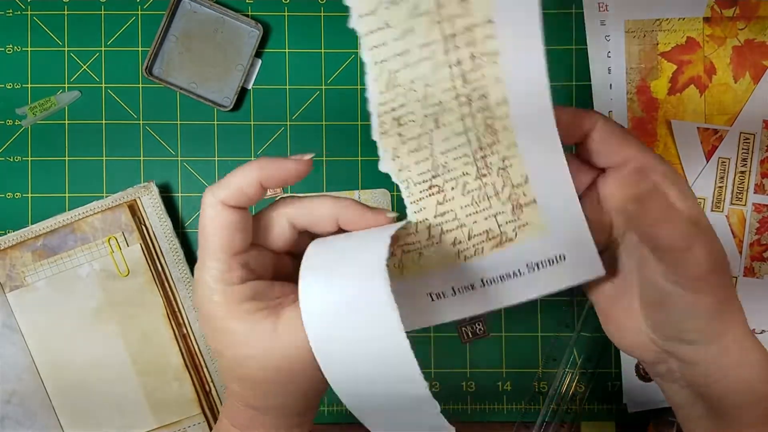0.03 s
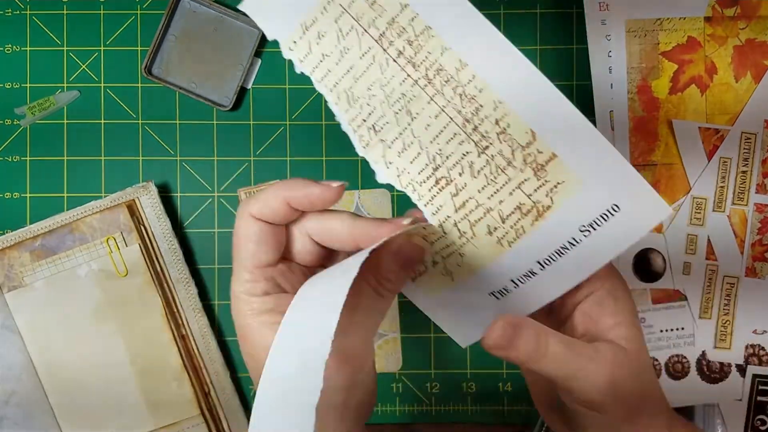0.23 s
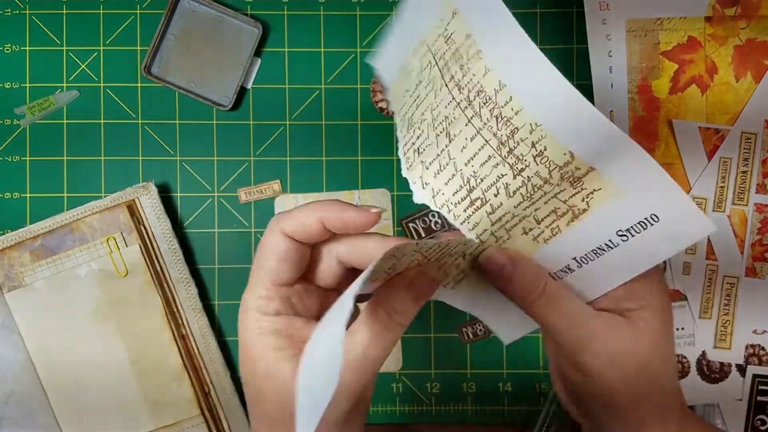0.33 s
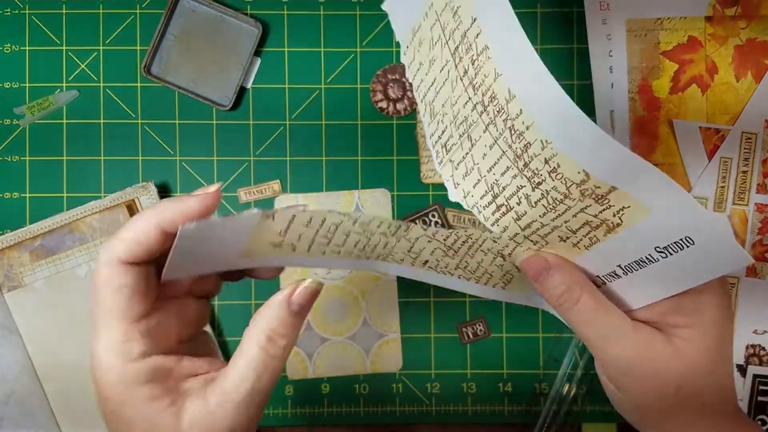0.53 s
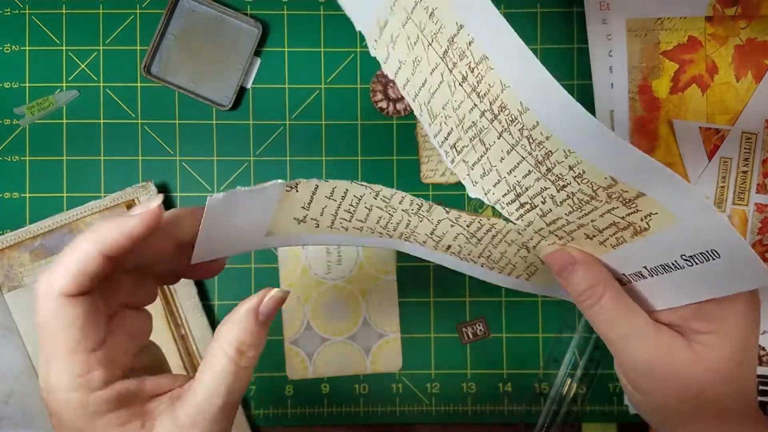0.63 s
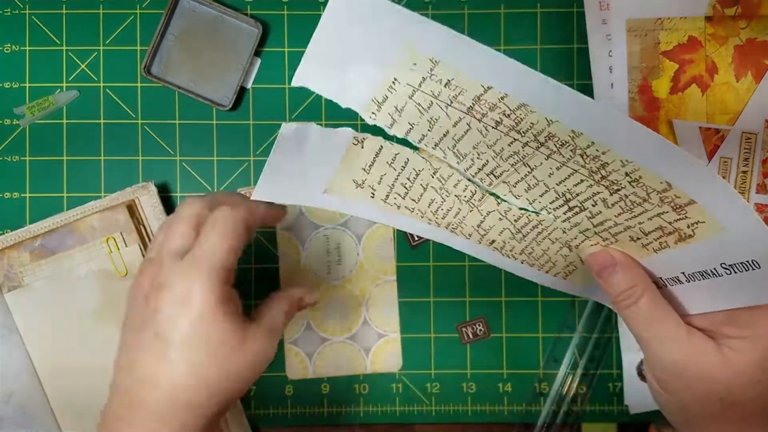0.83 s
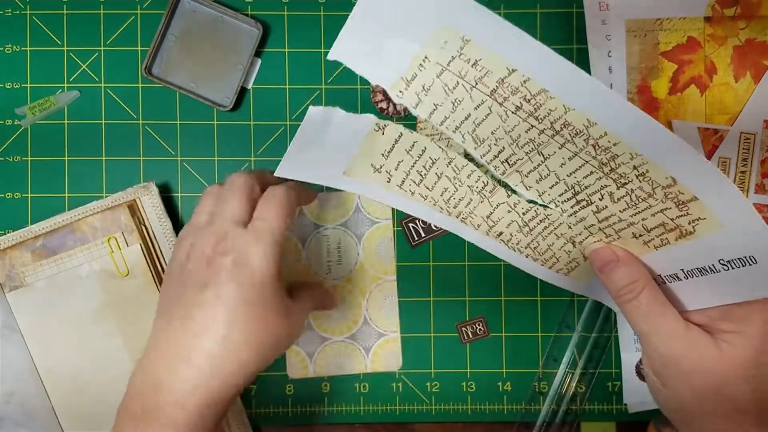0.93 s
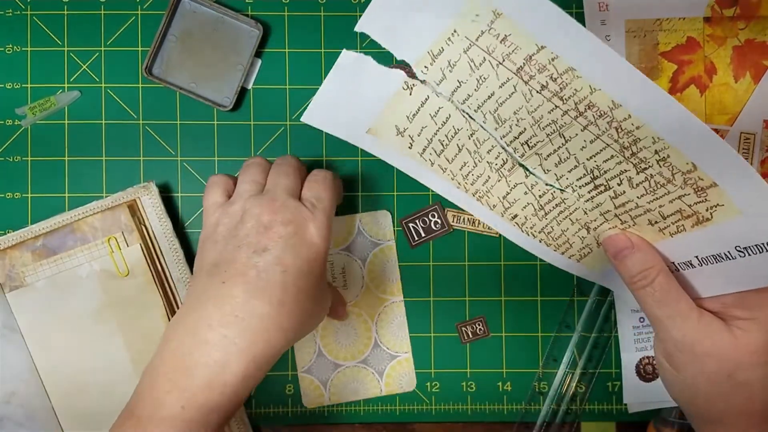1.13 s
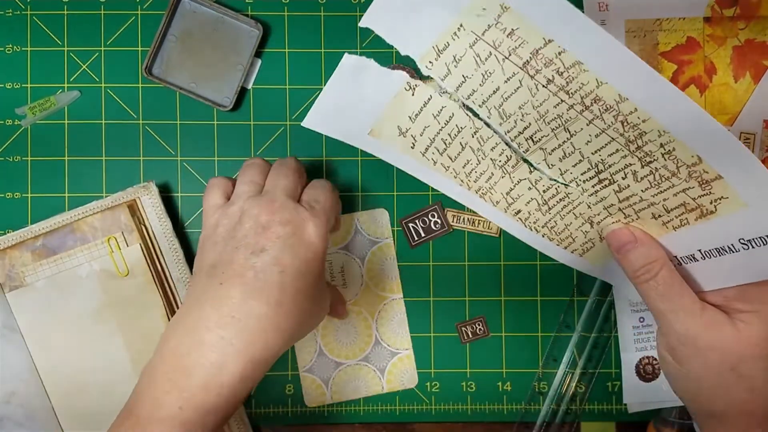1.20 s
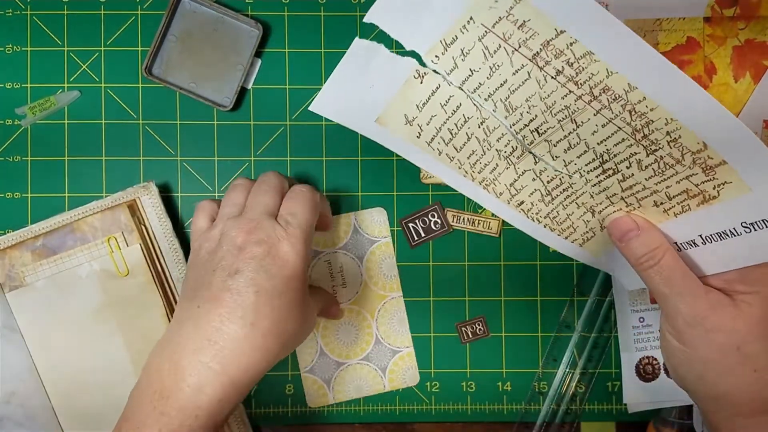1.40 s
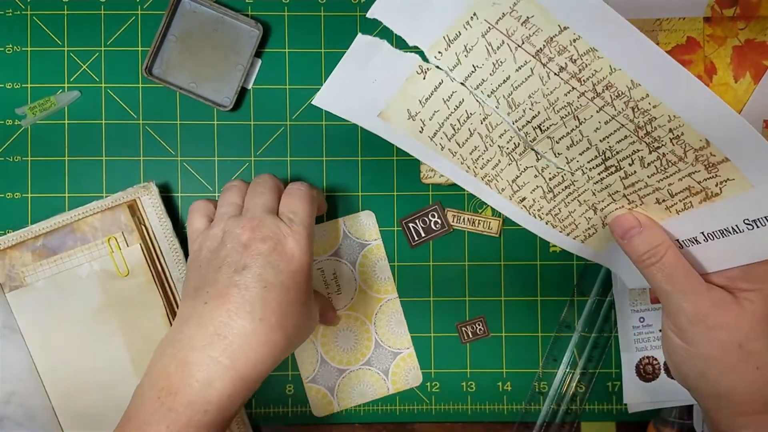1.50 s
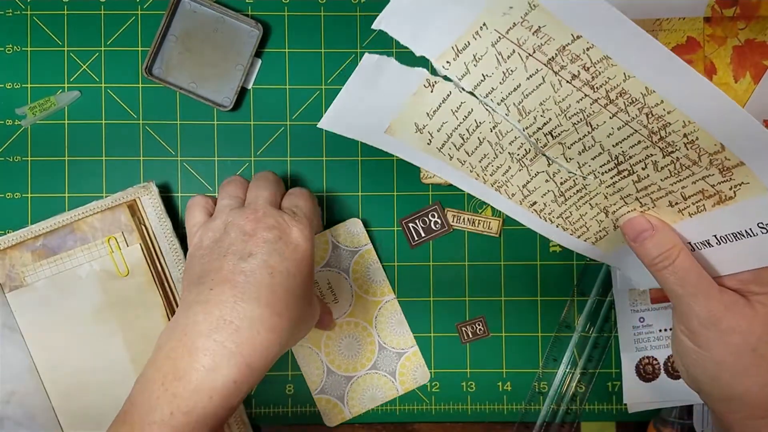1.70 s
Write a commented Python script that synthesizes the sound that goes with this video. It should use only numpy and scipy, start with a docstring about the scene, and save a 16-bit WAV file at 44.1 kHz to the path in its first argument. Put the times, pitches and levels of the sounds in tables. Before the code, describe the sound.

Paper ripped by hand: brief crunch and loud snap, light rustles, then dull card and finger knocks

```python
"""A strip is torn off a sheet of paper by hand over a craft table in a small room with a faint hum.
The last fibres crackle, creases crunch and the taut sheet snaps; the loose strip flaps, flicks and slides.
Then a hand comes down on a card on the cutting mat and drags it; at last the slack sheet pops and rubs on.
Snaps, pops and knocks are short sines, crackle and rubbing are coloured clicks, hiss is coloured noise."""
import sys
import numpy as np
from scipy import signal
from scipy.fft import rfft, irfft, next_fast_len
from scipy.io import wavfile

SR = 44100
rng = np.random.default_rng(int(sys.argv[2]) if len(sys.argv) > 2 else 0)


def log_audio(samples):
    """Write samples as a 16-bit WAV file to the path given in sys.argv[1]."""
    # one column per channel
    frames = np.atleast_2d(samples).T
    # limit to full scale, then quantise
    limited = np.clip(frames, -1, 1)
    pcm = np.round(limited * 32767).astype(np.int16)
    wavfile.write(sys.argv[1], SR, pcm)


N = 77175
T = np.arange(N) / SR
ATTACK_S = 0.00031  # rise of a click shower and of the room's tail

# left-right likeness of steady noise, rubbing and the room's tail: (f/Hz, likeness 0-1)
DIFFUSE_LIKENESS = [(30, 0.2), (100, 0.82), (350, 0.83), (1000, 0), (3000, 0), (12000, 0)]
# left-right likeness of fibre showers, touches and drags: (f/Hz, likeness 0-1)
CONTACT_LIKENESS = [(200, 0.94), (1000, 0.71), (3000, 0.25), (7000, 0.086), (14000, 0.102)]


def from_db(db):
    """Decibels to amplitude gain."""
    return 10 ** (np.asarray(db) / 20)


def rms_one(x):
    """Scale to unit rms."""
    return x / np.sqrt(np.mean(x ** 2) + 1e-20)


def on_bins(points):
    """Read a table over log frequency at every bin of a padded transform."""
    hz, value = np.transpose(points)
    bins = np.linspace(1, SR / 2, next_fast_len(N) + 1)
    return np.interp(np.log(bins), np.log(hz), value)


def colour(x, spectrum):
    """Causal (minimum-phase) filter with the shape of the spectrum and unit power gain."""
    gain = rms_one(from_db(on_bins(spectrum)))
    cepstrum = irfft(np.log(gain))
    size = len(cepstrum)
    # folding the cepstrum onto positive time gives minimum phase
    cepstrum[1:size // 2] *= 2
    cepstrum[size // 2 + 1:] = 0
    response = np.exp(rfft(cepstrum))
    return irfft(rfft(x, size) * response)[..., :N]


def stereo(pair, likeness):
    """Blend two unrelated signals into left and right, alike by frequency."""
    alike = np.clip(on_bins(likeness), 0, 1)
    mid, side = rfft(pair, 2 * (len(alike) - 1))
    common = np.sqrt(1 + alike) * mid
    opposed = np.sqrt(1 - alike) * side * [[1], [-1]]
    return irfft(common + opposed)[:, :N]


def grains(per_s, spread_db):
    """Two random trains of tiny clicks of uneven size and sign, rms 1."""
    size_db = spread_db * np.minimum(rng.exponential(1, (2, N)), 3)
    clicks = from_db(size_db) * rng.choice([-1, 1], (2, N))
    struck = rng.random((2, N)) < per_s / SR
    return rms_one(clicks * struck)


def envelope(start, attack, hold, release):
    """Straight rise, hold, exponential fall with time constant release; all in s."""
    rise = np.clip((T - start) / attack, 0, 1)
    fall = np.exp(-np.maximum(T - start - attack - hold, 0) / release)
    return rise * fall


def bursts(rows, spectrum):
    """Quickly dying showers of clicks, one for each (t/s, level/dB, decay/s)."""
    level = sum(from_db(db) * envelope(s, ATTACK_S, 0, decay) for s, db, decay in rows)
    clicks = grains(per_s=5000, spread_db=2.5) * level
    return colour(stereo(clicks, CONTACT_LIKENESS), spectrum)


def ringing(modes):
    """Dying sines of a body struck once, signs alternating: (f/Hz, level/dB, t60/s)."""
    ring = 0
    for k, (hz, db, t60) in enumerate(modes):
        decay = np.exp(-np.log(1000) * T / t60)
        ring = ring + from_db(db) * decay * np.sin(2 * np.pi * hz * T) * (-1) ** k
    return ring


def sheet_pop(event, modes, low_cut_hz=288):
    """Tension lets go at once: each mode swells and dies within ms; a thin sheet radiates no bass."""
    s, db, lead = event
    age = np.maximum(T - s + np.array([[0], [lead]]), 0)  # a lead makes the right ear earlier
    pop = 0
    for hz, level, swell in modes:
        swelling = age / swell * np.exp(1 - age / swell)  # peaks at 1 after the swell time
        pop = pop + from_db(level) * swelling * np.sin(2 * np.pi * hz * age)
    low_cut = signal.butter(4, low_cut_hz, "high", fs=SR, output="sos")
    return from_db(db) * signal.sosfilt(low_cut, pop)


def background():
    """Room air and hiss are coloured steady noise; the faint mains hum is one sine."""
    air_level_db, hum_hz = -63.5, 116.6
    air_db, hum_db = air_level_db, -75
    # spectrum of the air and hiss: (f/Hz, relative level/dB)
    floor_colour = [(25, -4), (45, -37), (62, 0.5), (80, -19.5), (115, 3), (150, -3.5), (320, 1.5),
                    (600, -4), (1500, -7), (3500, -16.5), (7500, -25.5), (10000, -24), (13000, -14.5),
                    (16000, -16.5)]
    air = colour(stereo(rng.standard_normal((2, N)), DIFFUSE_LIKENESS), floor_colour)
    hum = rms_one(np.sin(2 * np.pi * hum_hz * T))
    return from_db(air_db) * air + from_db(hum_db) * hum


def room(x):
    """Walls return a short diffuse noise tail and a few ringing resonances."""
    tail_db, tail_t60_s, gap_s, ring_t60_s = -12.5, 0.15, 0.0079, 0.16
    # lasting resonances of the room: (f/Hz, level/dB)
    room_modes = [(402, -61), (484, -58), (535, -57), (737, -63), (985, -62), (1245, -61.5), (1558, -59),
                  (1664, -60)]
    # spectrum of the tail: (f/Hz, relative level/dB)
    room_colour = [(100, -14.5), (260, -8.5), (450, 1), (1600, -1.5), (2350, -5.5), (3200, 1.5), (8000, -4),
                   (16000, 4)]
    tail = rng.standard_normal((2, N)) * envelope(gap_s, ATTACK_S, 0, tail_t60_s / np.log(1000))
    unit_energy = rms_one(tail) / np.sqrt(N)
    tail = colour(stereo(unit_energy, DIFFUSE_LIKENESS), room_colour)
    rings = ringing([(hz, db, ring_t60_s) for hz, db in room_modes])
    return signal.fftconvolve(x, from_db(tail_db) * tail + rings, axes=1)[:, :N]


def drags():
    """The palm drags the card over the mat: grains of friction in a soft, low rub."""
    # drags: (start t/s, attack/s, hold/s, release/s, level/dB)
    drag_moves = [(.905, 0.011, 0.031, 0.024, -58), (1.405, 0.031, 0.032, 0.063, -66)]
    # spectrum of the muffled rub: (f/Hz, relative level/dB)
    drag_colour = [(90, -13), (200, 0.5), (420, 0.5), (900, -5), (1400, -12.5), (2000, -23.5), (8000, -32)]
    level = sum(from_db(db) * envelope(*shape) for *shape, db in drag_moves)
    friction = level * grains(per_s=1800, spread_db=1.0)
    return colour(stereo(friction, CONTACT_LIKENESS), drag_colour)


def taps():
    """Each touch on the mat is a soft push, a knock of the table, a dull scuff and a dry tick."""
    scuff_db, tick_decay_s = -2.5, 0.0014  # the scuff's level is relative to the knock's setting
    # fingers and card touch the mat: (t/s, knock/dB, scuff decay/s, tick/dB, push/dB)
    touches = [(.9022, -50, 0.013, -44.5, -45), (0.9334, -59, 0.011, -68, -44),
               (1.0298, -50.5, 0.01, -52, -52.5), (1.0470, -53, 0.0035, -38.5, -68),
               (1.0722, -41.5, 0.0048, -44.5, -43.5), (1.0845, -50, 0.0059, -66, -70),
               (1.224, -54.5, 0.0093, -46, -50), (1.3931, -59.5, 0.008, -73, -49.5)]
    # what the table top rings with: (f/Hz, relative level/dB, t60/s)
    table_modes = [(120, -13.5, 0.18), (320, -6.5, 0.094), (387, -4.5, 0.046), (484, -10, .07),
                   (619, -3, 0.055), (757, -8, 0.072), (912, -8.5, 0.084), (1037, -10.5, 0.083)]
    # a fingertip pressing the card down: (f/Hz, relative level/dB, swell time/s)
    push_modes = [(249, -0.5, 0.0024)]
    # spectrum of the dull scuff: (f/Hz, relative level/dB)
    scuff_colour = [(60, -16), (130, -8), (280, -10.5), (420, -1), (650, -0.5), (1000, -5.5), (1700, -16.5),
                    (4000, -18), (12000, -40)]
    # spectrum of the dry tick: (f/Hz, relative level/dB)
    tick_colour = [(300, -11), (1300, 3), (2300, -7.5), (3700, -2.5), (5500, -3.5), (7800, -13),
                   (12000, -3.5), (16000, -1.5)]
    ring = ringing(table_modes)
    knocks = sum(from_db(db) * np.interp(T - s, T, ring, left=0) for s, db, *_ in touches)
    pushes = sum(sheet_pop((s, db, 0), push_modes, low_cut_hz=98) for s, *_, db in touches)
    scuffs = bursts([(s, db + scuff_db, decay) for s, db, decay, *_ in touches], scuff_colour)
    ticks = bursts([(s, db, tick_decay_s) for s, _, _, db, _ in touches], tick_colour)
    return knocks + pushes + scuffs + ticks


def slides():
    """Paper sliding on skin or paper gives a fine high hiss over a grainy rustle."""
    # slides: (start t/s, attack/s, hold/s, release/s, hiss/dB, rustle/dB)
    strokes = [(.01, 0.051, 0.024, 0.035, -71, -70), (0.192, 0.015, 0.06, 0.033, -51.5, -59.5),
               (0.313, 0.07, 0.0092, 0.022, -63.5, -61.5), (0.442, 0.0051, 0.0086, .008, -57, -61.5),
               (0.929, 0.032, 0.026, 0.039, -54.5, -66.5), (1.042, 0.016, 0.015, 0.012, -74, -58),
               (1.607, 0.051, 0.08, .03, -52.5, -65.5)]
    # spectrum of the hiss: (f/Hz, relative level/dB)
    hiss_colour = [(1000, -24), (6500, -16.5), (9500, -7), (12500, 0.5), (15500, 2.5)]
    # spectrum of the rustle: (f/Hz, relative level/dB)
    rustle_colour = [(100, -3), (350, -9.5), (1200, -2), (3500, -3.5), (5500, -7), (9000, -13.5),
                     (16000, -30)]
    hiss_level = sum(from_db(db) * envelope(*shape) for *shape, db, _ in strokes)
    rustle_level = sum(from_db(db) * envelope(*shape) for *shape, _, db in strokes)
    hiss = hiss_level * rng.standard_normal((2, N))
    rustle = rustle_level * grains(per_s=3800, spread_db=0.9)
    fine = colour(stereo(hiss, DIFFUSE_LIKENESS), hiss_colour)
    return fine + colour(stereo(rustle, DIFFUSE_LIKENESS), rustle_colour)


def flaps():
    """The freed strip swings and pushes the air: a short hollow thump."""
    # flaps: (t/s, level/dB)
    swings = [(0.223, -41), (0.2504, -44.5), (0.4466, -48)]
    # the hollow body: (f/Hz, relative level/dB, swell time/s)
    flap_modes = [(406.5, -0.5, .003)]
    return sum(sheet_pop((s, db, 0), flap_modes) for s, db in swings)


def buckle():
    """The slack sheet gives way with a pop of its own modes."""
    # the buckle: (t/s, level/dB, right-ear lead/s)
    buckling = (1.6047, -37.5, -0.000059)
    # what the slack sheet rings with: (f/Hz, relative level/dB, swell time/s)
    slack_modes = [(457, -4, 0.0012), (1370, -1, 0.0013), (1760, -5.5, 0.0011), (2410, 6, 0.00046),
                   (3170, 4, 0.0011), (4870, -0.5, 0.00048)]
    return sheet_pop(buckling, slack_modes)


def creases():
    """Small creases give way with a crunch, each popping at a pitch of its own."""
    # creases: (t/s, level/dB, pitch f/Hz)
    crunches = [(0.1857, -35.5, 1293), (.1778, -45, 2290), (0.2216, -37.5, 1730), (.2315, -38, 2084),
                (.2338, -33, 1195), (0.2527, -48, 2510), (1.6313, -52, 1310)]
    # what a crease rings with: (multiple of its pitch, relative level/dB, swell time/s)
    crease_modes = [(1, 1, 0.0011), (1.7, -7, 0.00076)]
    pops = 0
    for s, db, hz in crunches:
        modes = [(hz * ratio, level, swell) for ratio, level, swell in crease_modes]
        pops = pops + sheet_pop((s, db, 0), modes)
    return pops


def crinkles():
    """Short rips and crinkles: fibres break in showers and shake the sheet."""
    # rips and crinkles: (t/s, sheet level/dB, decay/s, bright fibre level/dB)
    rips = [(.001, -49.5, 0.012, -60), (0.1767, -48.5, 0.0061, -44.5), (0.1865, -48, 0.015, -71),
            (0.2048, -42, 0.012, -50), (0.2108, -33.5, 0.0042, -44), (0.2197, -43.5, 0.011, -49),
            (0.231, -43.5, 0.0025, -57), (0.2495, -55, 0.0084, -51), (0.348, -56, 0.0084, -72),
            (0.433, -63, 0.0034, -49), (0.4467, -55, 0.0083, -53), (1.0306, -60, 0.0037, -52),
            (1.0729, -67, 0.0019, -48.5), (1.6046, -59, 0.0034, -44.5), (1.6306, -55.5, .003, -57)]
    # spectrum of the shaken sheet: (f/Hz, relative level/dB)
    crinkle_colour = [(100, -35), (270, -14.5), (410, -3.5), (700, -5.5), (1250, -5), (2400, -5.5),
                      (4000, -13.5), (8000, -21), (16000, -32.5)]
    # spectrum of the breaking fibres: (f/Hz, relative level/dB)
    fibre_colour = [(200, -7.5), (1200, -12.5), (2500, -1), (4500, -4.5), (7800, -15), (11000, -11),
                    (16000, -14)]
    sheet = bursts([(s, db, decay) for s, db, decay, _ in rips], crinkle_colour)
    fibres = bursts([(s, db, decay) for s, _, decay, db in rips], fibre_colour)
    return sheet + fibres


def snaps():
    """The taut sheet snaps as the strip parts and again, faintly, as it flicks back."""
    # snaps: (t/s, level/dB, right-ear lead/s)
    partings = [(.2101, -14.5, 0.000031), (0.4338, -48, .00002)]
    # what the taut sheet rings with: (f/Hz, relative level/dB, swell time/s)
    taut_modes = [(444, -8.5, 0.0014), (772, -17, 0.0025), (955, -13, 0.002), (1230, -9.5, 0.0014),
                  (1648, -15, 0.0024), (2360, -0.5, 0.0016), (2730, -6.5, 0.00069), (3760, -19, 0.0011),
                  (5560, -23.5, 0.00098), (6720, -15, 0.00047)]
    return sum(sheet_pop(parting, taut_modes) for parting in partings)


def scene():
    """Paper and hands close by, in the room and without deep bass, over the background."""
    touch_right_db, slide_right_db, rumble_cut_hz = 0.8, 1, 73
    mat = (taps() + drags()) * from_db([[0], [touch_right_db]])
    contacts = mat + flaps() + buckle() + creases() + crinkles() + snaps()
    near = contacts + room(contacts) + slides() * from_db([[0], [slide_right_db]])  # slides stay dry
    rumble_cut = signal.butter(2, rumble_cut_hz, "high", fs=SR, output="sos")
    return signal.sosfilt(rumble_cut, near) + background()


def record(dry):
    """A steep elliptic low-pass cuts the top above 15750 Hz."""
    top_cut = signal.ellip(12, .1, 70, 15750, fs=SR, output="sos")  # ripple and stopband in dB
    return signal.sosfilt(top_cut, dry)


dry = scene()
out = record(dry)
log_audio(out)
```